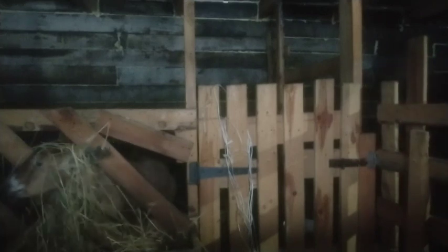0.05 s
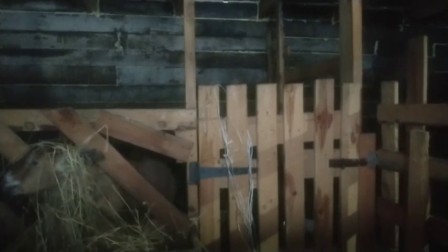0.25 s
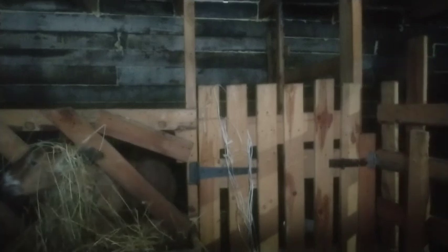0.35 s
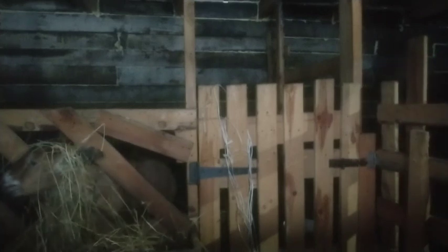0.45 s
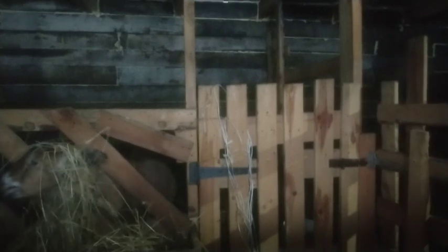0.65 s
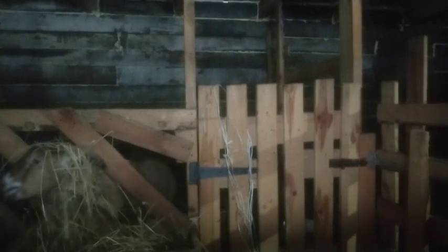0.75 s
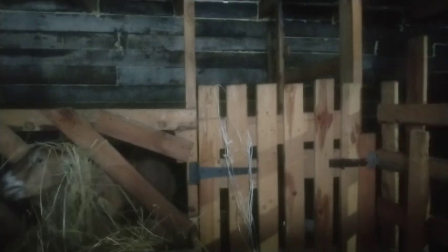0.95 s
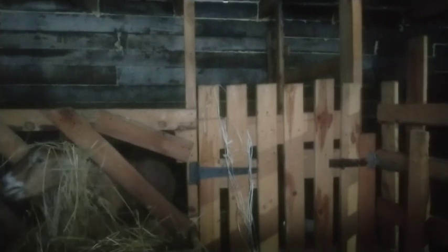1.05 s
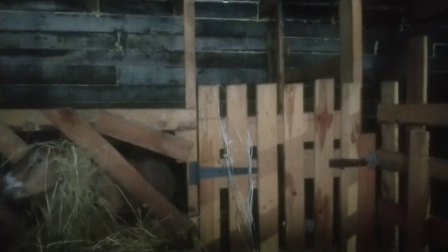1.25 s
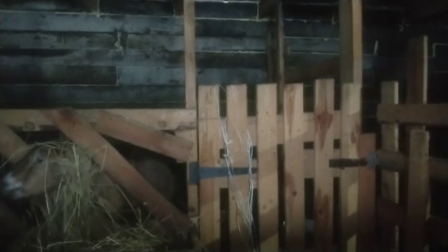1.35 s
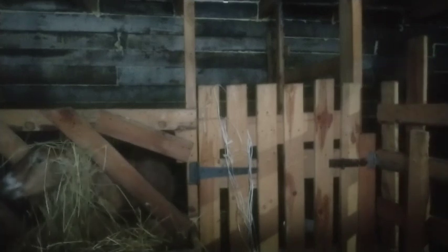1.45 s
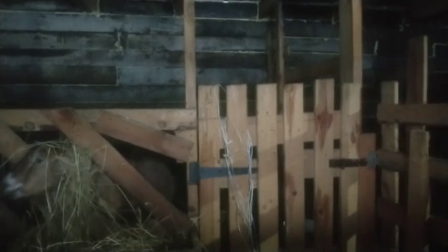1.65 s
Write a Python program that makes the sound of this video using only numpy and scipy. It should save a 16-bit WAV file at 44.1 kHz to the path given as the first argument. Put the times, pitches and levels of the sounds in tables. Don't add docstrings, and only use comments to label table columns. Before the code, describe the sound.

A goat bleats once in a small wooden shed. A hoof scuffs a board at 0.05 s, then a low closed-mouth hum from 0.18 s slides up at 0.3 s into a bleat, opening loud and nasal from 0.6 s, quavering after 1.1 s, falling hoarse by 1.4 s. Hay rustles, straw snaps near 0.46 s, hooves thud at 1.04 and 1.12 s. A faint far kid starts at 1.63 s over quiet rumbling air.

```python
import sys
import numpy as np
from scipy import signal
from scipy.fft import rfft, irfft, next_fast_len
from scipy.io import wavfile
from scipy.ndimage import map_coordinates

SR = 44100
rng = np.random.default_rng(int(sys.argv[2]) if len(sys.argv) > 2 else 0)


def attenuation_scalar(level_db):
    decades = np.asarray(level_db, float) / 20
    return 10 ** decades


def dump_mix(stems):
    frames = np.atleast_2d(stems).T
    limited = np.clip(frames, -1, 1)
    pcm = np.round(limited * 32767).astype(np.int16)
    wavfile.write(sys.argv[1], SR, pcm)


N = 74970


def unit(x):
    return x / np.sqrt(np.mean(x ** 2) + 1e-20)


def along(points, hz):
    f, v = np.transpose(points)
    return np.interp(np.log(hz + 1), np.log(f + 1), v)


def curves(rows):
    s, *cols = np.transpose(rows)
    return [np.interp(np.arange(N) / SR, s, c) for c in cols]


def wobble(rate):
    return map_coordinates(rng.standard_normal(200), [np.arange(N) * min(rate, 100) / SR])


def bump(s, width):
    return np.exp(-((np.arange(N) / SR - s) / width) ** 2)


def filtered(x, response):
    m = next_fast_len(N + SR // 2)
    spectrum = rfft(x, m)
    return irfft(spectrum * response(np.fft.rfftfreq(m, 1 / SR)), m)[..., :N]


def hiss(spectrum, alike):
    common, *own = rng.standard_normal((3, N))
    share = np.clip(alike, 0, 1)
    both = np.sqrt(share) * common + np.sqrt(1 - share) * np.array(own)
    return unit(filtered(both, lambda hz: attenuation_scalar(along(spectrum, hz))))


def bursts(rows, t60, rise):
    start, level_db = np.array(rows)[:, :1], np.array(rows)[:, 1:2]
    since = np.clip(np.arange(N) / SR - start, 0, None)
    return (attenuation_scalar(level_db - 60 * since / t60) * (1 - np.exp(-since / rise))).sum(0)


# f/Hz, level/dB
AIR_COLOUR = [(35, -54), (60, 3.5), (400, 7.5), (850, -42), (1300, -10), (3500, -13.5), (15000, -14.5)]


def air():
    rumble_colour = [(25, -24.5), (45, -15), (70, -4.5), (130, -16), (250, -19), (400, -120)]
    rumble = attenuation_scalar(-75 + 1.1 * wobble(3.3)) * hiss(rumble_colour, 1.0)
    return rumble + attenuation_scalar(-66.5 + wobble(3.2)) * hiss(AIR_COLOUR, 0.44)


# t/s, level/dB
HAY_STIRRING = [(0.0, -55), (0.08, -54.5), (.15, -59), (0.25, -54.5), (.45, -57), (0.686, -56.5),
                (.95, -56.5), (1.1, -53), (1.2, -57.5), (1.29, -54.5), (1.4, -59.5), (1.5, -66), (1.7, -67)]
# f/Hz, level/dB
HAY_COLOUR = [(200, 10.5), (900, 4), (2500, 1.5), (4500, 1), (8200, 2.5), (10400, 1), (12200, 3),
              (15500, -4)]
# t/s, level/dB, width/s
RASP_SWELLS = [(0.399, -64.5, 0.13), (.54, -68, 0.016), (0.689, -66.5, 0.03), (.85, -84, 0.22),
               (0.999, -57.5, 0.022), (1.106, -63.5, 0.03), (1.21, -63, 0.014), (1.33, -72, 0.045)]
# t/s, level/dB
STRAW_TICKS = [(.187, -46), (.4555, -39), (.461, -40), (.467, -44), (.473, -46), (.481, -50), (1.28, -50),
               (1.29, -53), (1.475, -56)]
# f/Hz, level/dB
STRAW_COLOUR = [(4500, -40), (6000, -16), (7500, -5), (9500, -9), (13000, 0), (15000, -4), (16500, -10)]


def hay():
    stir_db, = curves(HAY_STIRRING)
    uneven_db = wobble(11.9) + [[-1.2], [1.2]]
    bed = attenuation_scalar(stir_db + uneven_db) * hiss(HAY_COLOUR, 0.038)

    voice_phase = 2 * np.pi * np.cumsum(curves(BLEAT)[0]) / SR
    pulsing = (1 + np.cos(voice_phase)) ** 2 / 2
    swells = sum(attenuation_scalar(level_db) * bump(s, width) for s, level_db, width in RASP_SWELLS)
    rasp = hiss([(9000, -52.5), (11500, -5), (12500, 10), (13500, -31), (15500, -33)], 0.4)

    ticks = bursts(STRAW_TICKS, t60=0.016, rise=0.0003) * hiss(STRAW_COLOUR, 0.6)
    return bed + swells * pulsing * rasp + ticks


# t/s, level/dB
BOARD_KNOCKS = [(.047, -41), (.058, -46.5), (.072, -70), (.088, -68)]
# f/Hz, level/dB
BOARD_COLOUR = [(340, -16.5), (500, -22), (650, 0), (850, 3), (1080, -6), (1350, 1), (1700, -6),
                (4000, -39)]
# f/Hz, level/dB
SCRAPE_COLOUR = [(500, -30), (800, -4), (1500, -3), (1850, 0), (2300, 0), (2700, -5), (3300, -30)]


def scuffed_board():
    wood = bursts(BOARD_KNOCKS, t60=0.19, rise=0.005) * hiss(BOARD_COLOUR, 0.29)
    scrape = bursts([(0.047, -43)], t60=0.22, rise=0.0021) * hiss(SCRAPE_COLOUR, 0.39)
    return wood + scrape


# t/s, level/dB
HOOF_THUDS = [(0.252, -55), (1.041, -40), (1.065, -73), (1.122, -47), (1.389, -82)]


def hooves():
    floor_hz, swell_s = 55.5, 0.013
    start, level_db = np.array(HOOF_THUDS)[:, :1], np.array(HOOF_THUDS)[:, 1:]
    since = np.clip(np.arange(N) / SR - start, 0, None)
    swell = since / swell_s * np.exp(-since / swell_s)
    thuds = attenuation_scalar(level_db + 4.5) * swell * np.sin(2 * np.pi * floor_hz * since)
    return thuds.sum(0) * attenuation_scalar([[-1.5], [1.5]])


# f/Hz, time to fall 60 dB/s
WALL_DECAY = [(200, .3), (700, .3), (1500, .24), (10000, .16)]


def shed(x):
    hz, t, z = signal.stft(rng.standard_normal((2, SR // 2)), SR, nperseg=256)
    fade = attenuation_scalar(-60 * t / along(WALL_DECAY, hz)[:, None])
    tail = signal.istft(z * fade, SR, nperseg=256)[1]
    late = np.pad(x, (250, 0))[None]
    return signal.fftconvolve(late, tail / np.linalg.norm(tail[0]), axes=1)[:, :N]


# f/Hz, level/dB
CLOSED_MOUTH = [(170, 14), (260, 1), (450, -18), (740, -7), (1000, -22), (1300, -26), (2100, -23.5),
                (5000, -31)]
# f/Hz, level/dB
OPEN_MOUTH = [(260, -16), (530, -5.5), (790, -7.5), (1060, 0), (1320, -28.5), (2150, -16.5), (3100, -32.5),
              (5000, -44.5)]
# f/Hz, width/Hz, level/dB
THROAT_RINGS = [(2400, 200, 3), (3450, 170, 6), (4500, 200, 7)]


def mouth_db(f, opening):
    wide = np.clip(1.084 * opening, 0, 1)
    closing = 1 - opening
    rings = sum(g_db * np.exp(-((f - c_hz) / w_hz) ** 2) for c_hz, w_hz, g_db in THROAT_RINGS)
    opened = along(OPEN_MOUTH, f * (1 + 0.17 * closing)) - 18.5 * closing * (f > 1400) + rings
    return (1 - wide) * along(CLOSED_MOUTH, f) + wide * opened


# t/s, width/s, f/Hz, cut/dB
NOSE_SHIFTS = [(.6, .1, 785, 9), (.435, .035, 490, 15), (.5, .04, 770, 12), (.568, .014, 780, -9),
               (.235, .045, 530, -12), (.67, .04, 525, 5), (1.17, .06, 785, 6), (1.27, .025, 1030, 6),
               (.35, .03, 2100, -8), (.435, .03, 1230, 8), (1.39, .035, 680, -5), (1.12, .03, 2100, -5)]
# f/Hz, level/dB
BREATH_COLOUR = [(200, -20), (400, -17), (650, -1), (900, -2), (1300, -18), (2200, -18), (3200, -30),
                 (5000, -42)]


def voice(rows, catches=(), count=21):
    hz, db, opening, hoarse = curves(rows)
    chest_db = np.zeros(N)
    for s, dip_db, width, step, more_db in catches:
        db = db - dip_db * bump(s, width)
        hz = hz * (1 + step * bump(s, 1.56 * width))
        chest_db = chest_db - more_db * bump(s, 0.025)
    opening, hoarse = np.clip(opening, 0, 1), np.clip(hoarse, 0, 1)

    jitter = 0.0025 * wobble(39.9) + 0.038 * hoarse * wobble(100)
    phase = 2 * np.pi * np.cumsum(hz * (1 + jitter)) / SR

    shifts = [(f_hz, cut_db * bump(s, width)) for s, width, f_hz, cut_db in NOSE_SHIFTS]
    gains, tones = [], []
    for k in range(1, count):
        f = k * hz
        nose_db = sum(cut_db * np.exp(-((f - f_hz) / 120) ** 2) for f_hz, cut_db in shifts)
        top = 1 + (f / 4800) ** 20
        gain = attenuation_scalar(mouth_db(f, opening) - nose_db) / top
        tremble_db = min(np.sqrt(k), 2.6) * (0.8 * wobble(14) + 0.5 * wobble(60.22))
        wave = np.sin(k * phase - 0.23 * k - 0.1381 * k * k)
        gains.append(gain)
        tones.append(gain * attenuation_scalar(tremble_db) * wave)
    buzz = tones[0] * attenuation_scalar(chest_db - 20 * hoarse) + sum(tones[1:])
    limp = 1 + 2.5 * hoarse ** 2 * np.cos(phase / 2)
    buzz = buzz * limp * np.sqrt(2 / (np.array(gains) ** 2).sum(0))

    puffs = rng.standard_normal(N) * (1 + 0.42 * np.cos(phase))
    breath = unit(filtered(puffs, lambda f: attenuation_scalar(along(BREATH_COLOUR, f))
                           / (1 + (120 / (f + 1)) ** 4) / (1 + (f / 5200) ** 8)))
    leak_colour = [(1000, -33), (2200, -10), (4500, -12), (5500, -44)]
    leak = attenuation_scalar(-39) * unit(filtered(puffs, lambda f: attenuation_scalar(along(leak_colour, f))))

    t = np.arange(N) / SR
    sounding = (t > rows[0][0]) * (t < rows[-1][0])
    strength = attenuation_scalar(db + 7 * hoarse * wobble(90)) * sounding
    return strength * (np.sqrt(1 - hoarse ** 2) * buzz + hoarse * breath + leak)


# t/s, f/Hz, level/dB, mouth opening/0-1, hoarseness/0-1
KID_CALL = [(1.612, 250, -85, .8, .3), (1.63, 251, -61, .8, .35), (1.665, 255, -65, .8, .35),
            (1.7, 256, -71, .8, .5)]


def kid():
    muffling = [(260, 6), (520, -3), (780, 3), (1040, -22), (3000, -36)]
    far = filtered(voice(KID_CALL), lambda hz: attenuation_scalar(along(muffling, hz)))
    return far * attenuation_scalar([[-3], [2]]) + attenuation_scalar(-34.5) * shed(far)


# t/s, f/Hz, level/dB, mouth opening/0-1, hoarseness/0-1
HUM = [(.172, 199.8, -102, 0, 0), (.182, 201.3, -43.5, 0.05, 0.05), (.205, 178, -38.5, 0.25, 0.16),
       (.232, 174.6, -29, 0.03, 0.05), (.265, 175.4, -29, 0, 0.12), (.285, 188.3, -35.5, 0.17, 0.05),
       (.32, 197, -58, 0.2, 0.1)]
# t/s, f/Hz, level/dB, mouth opening/0-1, hoarseness/0-1
BLEAT = [(.285, 225, -54, 0.26, 0.21), (.305, 235.5, -41.5, 0, 0.3), (.34, 235.6, -32, 0, 0.03),
         (.43, 247.1, -31.5, 0.16, 0.04), (.49, 257.3, -34, 0.15, 0.08), (.56, 259.5, -30.5, 0.61, 0.05),
         (.68, 264.5, -25.5, 0.95, 0.04), (.77, 266.8, -22.5, 1, 0.04), (.91, 263.1, -22.5, 0.95, 0.05),
         (1.02, 262.5, -21.5, 0.85, 0.09), (1.12, 263.4, -20.5, 0.96, 0.08),
         (1.22, 261.6, -21.5, 0.8, 0.09), (1.3, 250, -28.5, 1, 0.03), (1.35, 241.8, -22, 0.46, 0.05),
         (1.39, 224.1, -24.5, 0.17, 0.22), (1.415, 217.7, -34, 0.39, 0.53), (1.447, 221, -46.5, 0, 0.2),
         (1.5, 198, -59.5, 0.33, .5)]
# t/s, dip/dB, width/s, pitch step/share, extra chest tone dip/dB
CATCHES = [(0.388, 2, 0.026, -0.0055, 6.5), (0.51, 0, 0.0149, -0.007, 10.5),
           (0.608, -1, 0.017, 0.0083, 7.5), (1.06, 3.5, 0.021, 0.0016, 0.5), (1.164, 8.5, 0.022, 0.0101, 8),
           (1.247, 9, 0.0063, -0.018, 3), (1.276, 2, 0.007, -0.0176, 0), (1.368, 3, 0.0018, -0.0053, 28)]
# t/s, pose (-1 lifted, 0 ahead, 1 away)
HEAD_TURN = [(0, 0.55), (.5, 0.093), (.6, -0.36), (.66, -1), (.75, 0.15), (.98, 0), (1.12, 0.67),
             (1.7, -0.044)]
# f/Hz, left over right level/dB, left lead/rad
HEAD_LIFTED = [(260, -4, .2), (530, 11, -1), (790, 0, .5), (1055, -7, 1.6), (1320, 4, 1.6), (1600, -12, 1),
               (1900, -6, .6), (2600, 2, .2)]
# f/Hz, left over right level/dB, left lead/rad
HEAD_AHEAD = [(260, -4, .1), (530, 0, .3), (790, 1, 1.4), (1055, -13, 2.8), (1320, -2, .8), (1600, -8, 1),
              (1900, -5, 1.9), (2600, -3, 1.6)]
# f/Hz, left over right level/dB, left lead/rad
HEAD_AWAY = [(260, -4, .1), (530, -3, 2.5), (790, 0, .9), (1055, -8, 1.6), (1320, -6, .8), (1600, -2, 2),
             (1900, -13, 3), (2600, -10, 2.8)]


def goat():
    call = voice(HUM) + voice(BLEAT, CATCHES)
    side = np.array([[0.5], [-0.5]])
    turn = np.clip(curves(HEAD_TURN)[0], -1, 1)

    def heard(pose):
        lean, lead = pose[:, :2], pose[:, ::2]
        return filtered(call, lambda hz: attenuation_scalar(side * along(lean, hz)) * np.exp(1j * side * along(lead, hz)))

    direct = 0
    for pose, at in ((HEAD_LIFTED, -1), (HEAD_AHEAD, 0), (HEAD_AWAY, 1)):
        nearness = np.clip(1 - abs(turn - at), 0, 1)
        direct = direct + nearness * heard(np.array(pose))
    answer = filtered(shed(call), lambda hz: 0.1 + 1 / (1 + (500 / (hz + 1)) ** 4))
    return direct + attenuation_scalar(-11 - 13.4 * side) * answer


def scene():
    return goat() + kid() + hay() + scuffed_board() + hooves() + air()


def low_pass(x):
    return signal.sosfilt(signal.butter(12, 16490, fs=SR, output="sos"), x)


def record(dry):
    limited = filtered(dry, lambda hz: 1 / (1 + (hz / 15900) ** 80))
    return low_pass(limited)


dry = scene()
out = record(dry)
dump_mix(out)
```